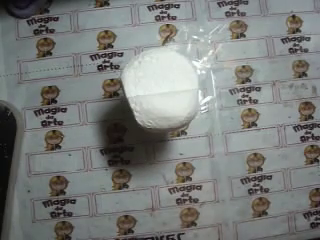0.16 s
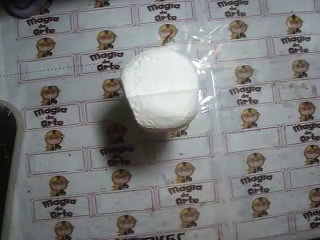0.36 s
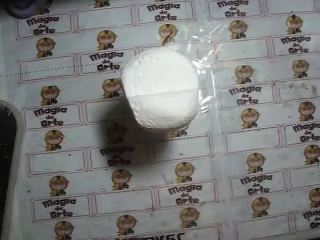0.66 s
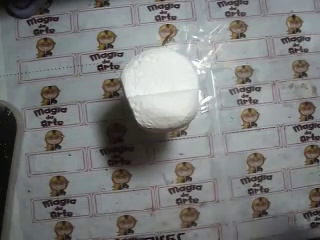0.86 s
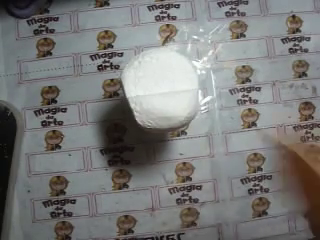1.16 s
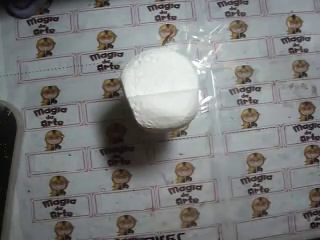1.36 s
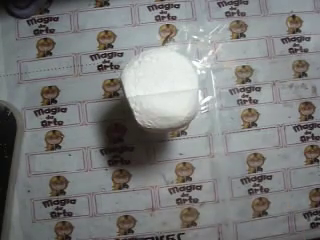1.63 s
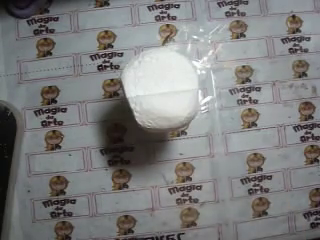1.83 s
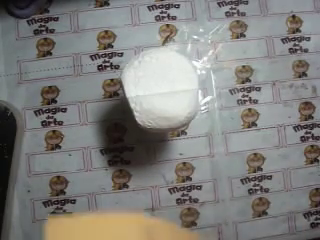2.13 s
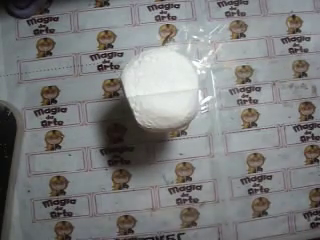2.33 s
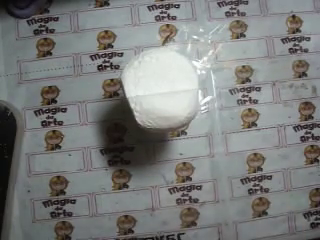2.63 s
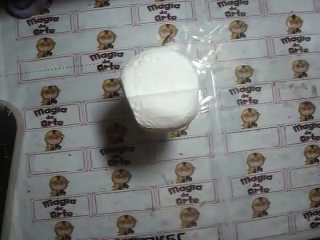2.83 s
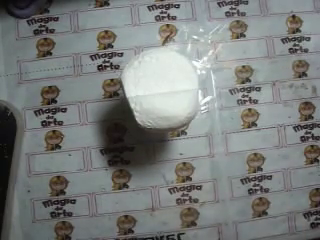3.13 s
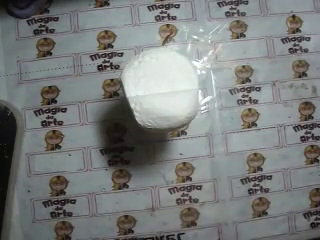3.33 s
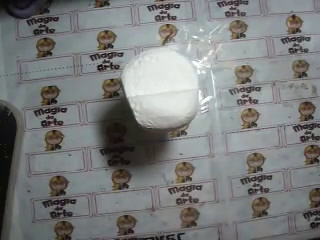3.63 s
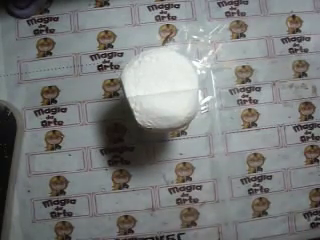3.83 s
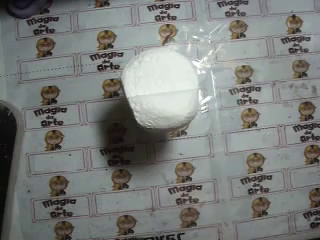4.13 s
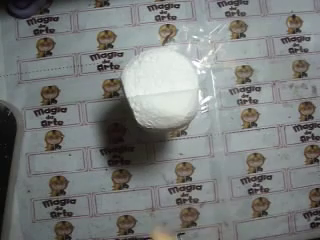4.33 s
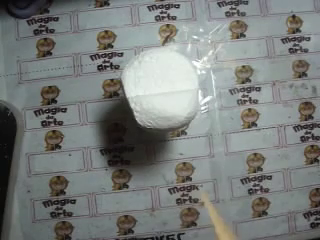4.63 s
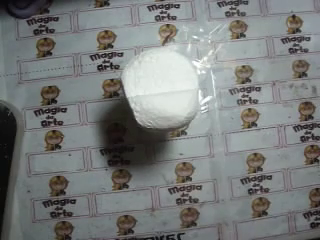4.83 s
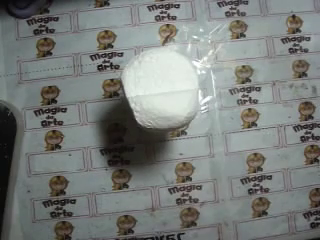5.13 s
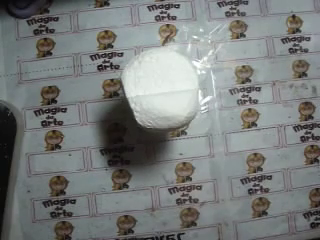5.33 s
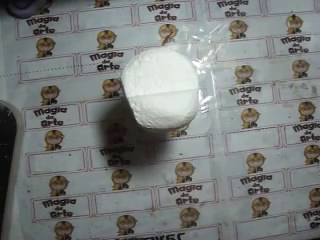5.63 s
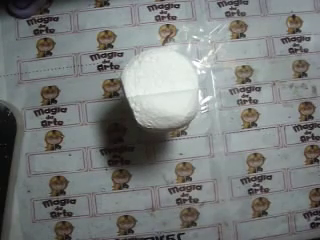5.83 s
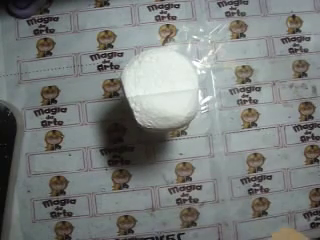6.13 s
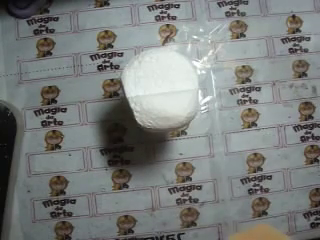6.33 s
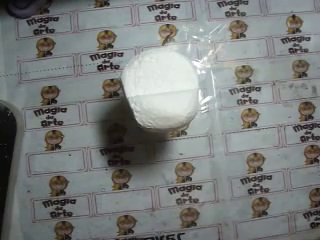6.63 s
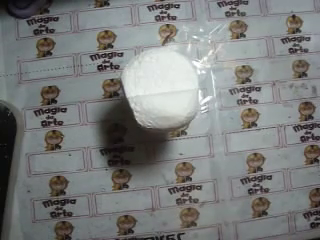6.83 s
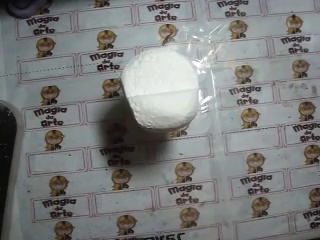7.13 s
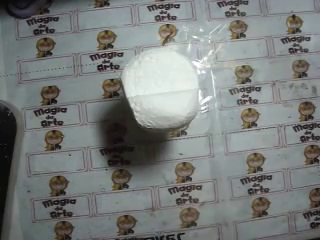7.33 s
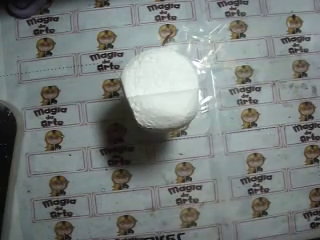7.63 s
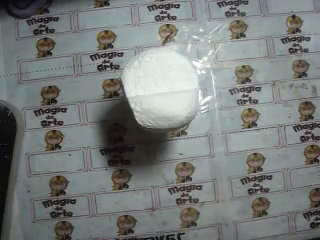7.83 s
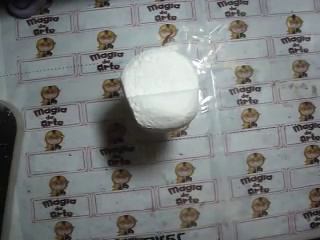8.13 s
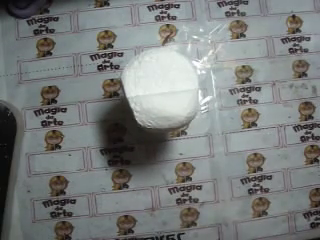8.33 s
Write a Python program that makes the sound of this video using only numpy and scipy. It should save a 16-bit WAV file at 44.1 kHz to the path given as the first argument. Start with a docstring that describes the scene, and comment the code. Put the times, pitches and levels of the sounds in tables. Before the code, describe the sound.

Steady buzzing fan and airy hiss in a small room, with scattered dry sheet clicks, soft table thuds and a faint engine outside.

```python
"""A heat gun runs steadily in a small room: its three-bladed fan hums as steady tones, its housing buzzes
as it rings from rotor knocks and draught, and shaped noise makes the air hiss out of the nozzle.
A craft sheet handled close to a dull little microphone ticks and crackles in short bursts of ringing noise.
Soft nudges thud through the table, and an engine drones faintly outside as three wavering tones.
The recorder limits the sharpest ticks and ducks after the loudest."""
import sys
import numpy as np
from scipy import signal
from scipy.fft import rfft, irfft, next_fast_len
from scipy.io import wavfile
from scipy.ndimage import uniform_filter1d, minimum_filter1d

SR = 44100
rng = np.random.default_rng(int(sys.argv[2]) if len(sys.argv) > 2 else 0)


def persist_wave(psi):
    """Save psi, clipped to +-1, as 16-bit WAV."""
    counts = np.round(np.clip(psi, -1, 1) * 32767).astype(np.int16)
    wavfile.write(sys.argv[1], SR, np.atleast_2d(counts).T)


N = 373086  # length of the scene in samples
TIME = np.arange(N) / SR  # seconds


def undb(db):
    """Turn decibels into a gain."""
    return 10 ** (np.asarray(db) / 20)


def level(x, db):
    """Scale a sound to a chosen average (rms) level."""
    return x * undb(db) / np.sqrt(np.mean(x ** 2))


def walk(rate):
    """Slow chance: about rate random steps a second, joined smoothly and scaled to rms 1."""
    steps = rng.standard_normal(4000)
    joined = np.interp(TIME * rate, np.arange(len(steps)), steps)
    return level(uniform_filter1d(joined, int(SR / rate / 2)), 0)


def coloured(points):
    """Noise whose spectrum follows (pitch_hz, level_db) points."""
    hz, db = np.transpose(points)
    size = next_fast_len(N)
    f = np.fft.rfftfreq(size, 1 / SR) + 1  # the 1 avoids log(0)
    gain = undb(np.interp(np.log(f), np.log(hz), db))
    return irfft(rfft(rng.standard_normal(size)) * gain, size)[:N]


def ring(x, modes):
    """Let a force set off resonances, each with a pitch, a width and a strength."""
    out = 0
    for hz, width, db in modes:
        out = out + undb(db) * signal.lfilter(*signal.iirpeak(hz, hz / width, fs=SR), x)
    return out


def lowpass(x, hz, order):
    """Smoothly remove the treble above hz."""
    return signal.sosfilt(signal.butter(order, hz, fs=SR, output="sos"), x)


def add(out, s, x):
    """Mix sound x into out, starting at s seconds."""
    i = max(int(s * SR), 0)
    out[i:i + len(x)] += x[:N - i]


# The engine outside: its pitch climbs slowly, then drops back as it fades.
# Columns: time_s [s], firing_rate_hz [Hz], level_db [dB, before engine_db]
ENGINE_PATH = [(0, 94.8, -52.5), (1.9, 96, -50.5), (2.3, 98, -40.5), (2.6, 99, -44), (2.95, 99.1, -36),
               (3.9, 102, -41.5), (4.5, 101, -52.5), (5.3, 100, -47), (5.68, 94.3, -31), (6.05, 90.6, -52),
               (8.4, 82, -61.5)]


def distant_engine(engine_db=-1, half_db=-13, upper_db=-16, waver=.006):
    """Only the drone of the firings gets indoors, with tones at half and one and a half times its rate."""
    s, hz, db = np.transpose(ENGINE_PATH)
    firing_hz = np.interp(TIME, s, hz) * (1 + waver * walk(rate=14))
    phase = 2 * np.pi * np.cumsum(firing_hz) / SR
    half = undb(half_db) * np.sin(phase / 2)
    upper = undb(upper_db) * np.sin(phase + phase / 2)
    return (np.sin(phase) + half + upper) * undb(np.interp(TIME, s, db) + engine_db)


# Soft nudges of the table. Columns: start_s [s], level_db [dB, before nudge_db]
TABLE_NUDGES = [(0.027, -38.5), (0.251, -39), (1.173, -37), (1.391, -38), (1.605, -40), (3.528, -42.5),
                (4.787, -41), (7.327, -41.5)]


def table(nudge_db=-7, swell_s=0.0047):
    """Soft pushes, made of briefly swelling noise, ring the table top at two low pitches: a thud."""
    out, t = np.zeros(N), TIME[:SR // 5]
    for s, db in TABLE_NUDGES:
        push = rng.standard_normal(len(t)) * t * np.exp(-t / swell_s)
        thud = ring(push, [(45, 21, 0.0065), (114, 23, 0.0051)])
        add(out, s, level(lowpass(thud, hz=220, order=2), db + nudge_db))
    return out


# What the sheet rings with: its bright crease, and its duller body.
# Columns of both: pitch_hz [Hz], width_hz [Hz], strength_db [dB, relative]
CREASE_RINGS = [(1490, 610, -2.5), (2096, 320, -3.5), (2620, 276, 2), (2934, 180, 0.5), (3185, 140, -7.5),
                (3500, 200, -8), (4670, 530, -6)]
BODY_RINGS = [(485, 220, -4.5), (770, 670, -8), (1013, 200, 7.5)]


def tick(db, body_db, t60, centre_hz, rise=0.095, hold=0.044, focus_hz=2000, tail_db=-20, tail_t60=0.095):
    """A crease gives way in a quick run of tiny slips, and the room answers faintly."""
    t = TIME[:SR // 10]
    slips, room = rng.standard_normal((2, len(t)))
    age = t / t60  # rise and hold are shares of t60, so a longer run also builds up more slowly
    run = (1 - np.exp(-age / rise)) * np.exp(-np.log(1000) * np.maximum(age - hold, 0))
    room_tail = room * undb(tail_db) * np.exp(-np.log(1000) * t / tail_t60)
    force = slips * run + room_tail
    # each crease favours the resonances near its own pitch
    pitched = ring(force, [(centre_hz, focus_hz, 0)])
    crease = lowpass(ring(pitched, CREASE_RINGS), 3700, order=5)
    body = lowpass(ring(force, BODY_RINGS), 1600, order=2)
    # a thin sheet radiates hardly any bass
    thin = signal.butter(4, 400, "high", fs=SR, output="sos")
    return signal.sosfilt(thin, level(crease, db) + level(body, db + body_db))


# a typical tick: level before tick_db, time to die away by 60 dB, and pitch
TYPICAL_DB, TICK_T60_S, TICK_HZ = -25, .028, 2470
# a harder tick snaps through sooner and sounds higher
SHORTER_OCT_PER_DB, HIGHER_OCT_PER_DB = 0.02, .008
HIGHER_OCT_PER_S = 0.033  # the ticks grow a little brighter as the work goes on


def creak(s, db, body_db):
    """The tick at time s; its length follows from its strength, its pitch from strength and time."""
    harder_db = db - TYPICAL_DB
    t60 = TICK_T60_S * 2 ** (-SHORTER_OCT_PER_DB * harder_db)
    centre_hz = TICK_HZ * 2 ** (HIGHER_OCT_PER_DB * harder_db + HIGHER_OCT_PER_S * s)
    return tick(db, body_db, t60, centre_hz)


# faint ticks: mean level (before tick_db), spread in level, spread in time around the clear ones
FAINT_DB, FAINT_SPREAD_DB, FAINT_SPREAD_S = -36.5, 1.5, .12
# Clear ticks of the sheet.
# Columns: start_s [s], level_db [dB, before tick_db], body_db [dB, dull body relative to the crease]
CLEAR_TICKS = [(0.032, -27, -8.5), (0.18, -31, -16), (0.254, -23, -6), (0.481, -17, -10.5),
               (0.661, -27, -7.5), (0.667, -21, -13), (0.682, -21, -12), (0.692, -24, -16),
               (0.956, -26, -6.5), (1.094, -28.5, -20), (1.176, -27, -5), (1.392, -26.5, -7),
               (1.54, -29, -25), (1.611, -28.5, -10.5), (2.369, -26, -25), (2.479, -17, -8.5),
               (2.633, -30.5, -15), (2.685, -25, -8.5), (2.852, -28.5, -9), (2.91, -26.5, -7.5),
               (3.065, -29, -14), (3.313, -14, -13.5), (3.542, -30.5, -6.5), (3.76, -32, -11.5),
               (4.001, -2.5, -13.5), (4.686, -28, -18), (4.695, -23.5, -8.5), (4.797, -23.5, -10.5),
               (5.0, -21, -8.5), (5.209, -24.5, -6), (5.375, -30.5, -20), (5.441, -21.5, -10.5),
               (6.003, -29.5, -7), (6.651, -21, -5.5), (6.817, -30, -10), (6.872, -25.5, -2.5),
               (7.252, -31.5, -13), (7.678, -24, -7.5), (8.363, -29.5, -2)]


def sheet(tick_db=-4.5, faint_body_db=-13, lead_s=0.00073):
    """The clear ticks, and faint ones scattered before and after them as the fingers shift."""
    out = np.zeros(N)
    for s, db, body_db in CLEAR_TICKS:
        add(out, s - lead_s, creak(s, db, body_db))  # starts a touch early, as a tick takes time to build
    chances = rng.standard_normal((len(CLEAR_TICKS), 2))
    for (s, _, _), (shift, strength) in zip(CLEAR_TICKS, chances):
        faint_s = (s + FAINT_SPREAD_S * shift) % TIME[-1]
        faint_db = FAINT_DB + FAINT_SPREAD_DB * strength
        # length follows the faint tick's own strength; pitch follows that and the clear tick's time
        add(out, faint_s, creak(s, faint_db, faint_body_db))
    return out * undb(tick_db)


SHAFT_HZ = 25.93  # turns per second of the fan


def shaft(wobble=.0007, flutter=.0012):
    """Count the turns made by the fan, whose speed wanders very slightly."""
    speed_hz = SHAFT_HZ * (1 + wobble * walk(rate=2.5) + flutter * walk(rate=30))
    return np.cumsum(speed_hz) / SR


# Colour of the air noise. Columns: pitch_hz [Hz], level_db [dB per Hz, relative]
AIR_COLOUR = [(20, -11.5), (50, -7), (90, -8), (130, -16.5), (270, -20), (450, -13.5), (700, -14.5),
              (1000, -16.5), (1450, -9.5), (2200, -12), (3050, -5.5), (3900, -22.5), (4900, -31),
              (6100, -37)]


def air(turns, throb=0.2, gust_db=1.5, air_db=-34.0):
    """Air rushes through the nozzle as noise, throbbing a little with the fan."""
    pulsing = 1 + throb * (np.sin(2 * np.pi * turns) + np.sin(4 * np.pi * turns))
    gusts = undb(gust_db * walk(rate=25))
    return level(coloured(AIR_COLOUR) * pulsing * gusts, air_db)


# Resonances of the gun's housing, rung by rotor and draught.
# Columns: pitch_hz [Hz], width_hz [Hz], strength_db [dB, relative]
HOUSING_RINGS = [(832, 24, -1), (906, 12, -3), (1118, 20, -1), (1245, 12, -1), (1300, 14, -1),
                 (1378, 16, 3), (1420, 28, 1), (1482, 28, 2), (1552, 18, 3), (1645, 20, 1), (1692, 28, 1),
                 (1860, 30, -1), (2160, 60, -2), (2640, 120, -2), (2970, 170, 3), (3220, 120, 0),
                 (4260, 160, -9)]


def rattle(turns, scatter_db=4, rattle_db=-39, draught_db=0):
    """The rotor brushes the same spots on every turn; these knocks and the draught ring the housing."""
    spots = rng.random(size=14)  # places around one turn
    laps = np.arange(int(turns[-1]) + 1)[:, None] + spots
    force = undb(scatter_db * rng.standard_normal(laps.shape))
    at = np.searchsorted(turns, laps.ravel())  # the sample at which each spot is reached
    knocks = level(np.bincount(at, force.ravel(), N + 1)[:N], 0)
    draught = undb(draught_db) * rng.standard_normal(N)
    housing = lowpass(ring(knocks + draught, HOUSING_RINGS), 3700, order=4)
    return level(housing, rattle_db)


# Fan tones; number three is the blade rate.
# Columns: multiple [times the shaft rate], level_db [dB, relative to base_db]
FAN_TONES = [(1, -8.5), (2, -13.5), (3, 1), (5, -22.5), (6, -17.5), (7, -18.5), (8, -21), (9, -17),
             (11, -17.5), (12, -21), (13, -26), (14, -13), (15, -14.5), (16, -17.5), (17, -15.5),
             (18, -17.5), (19, -14), (20, -27), (21, -14.5), (22, -19), (23, -19.5), (24, -17.5),
             (25, -24.5), (26, -31.5), (27, -22), (28, -17.5), (29, -17), (30, -29), (31, -14.5)]


def fan(turns, base_db=-40.0, shimmer_db=1.5):
    """Clean tones on multiples of the shaft rate, their levels ruffled by the air."""
    out = 0
    for k, db in FAN_TONES:
        tone = np.sin(2 * np.pi * (round(k) * turns + rng.random()))
        out = out + tone * undb(base_db + db + shimmer_db * walk(rate=6))
    return np.sqrt(2) * out  # makes the levels rms


def scene():
    """The engine outside, the sheet on the table and the gun, mixed to one channel."""
    turns = shaft()
    gun = air(turns) + rattle(turns) + fan(turns)
    return (distant_engine() + table() + sheet() + gun)[None]


def gain_control(x):
    """Loud peaks pull the gain down; it holds briefly, then comes back at a steady rate."""
    threshold_db, hold_s, release_db_per_s, deepest_db = -11, .06, 55, 7
    window = SR // 70
    power = signal.lfilter(np.ones(window) / window, 1, x[0] ** 2)
    over_db = 10 * np.log10(power + 1e-12) - threshold_db
    cut_db = np.clip(2 * over_db, 0, deepest_db)  # 2 dB of cut for each dB over
    hold = int(hold_s * SR) | 1
    cut_db = -minimum_filter1d(-cut_db, hold, origin=hold // 2)  # keep the deepest recent cut
    recovery = release_db_per_s * TIME
    return x * undb(recovery - np.maximum.accumulate(cut_db + recovery))


def limiter(x):
    """Squeeze the tallest swings within a millisecond and softly clip what is left."""
    knee, ceiling = .82, .72
    gain = knee / np.maximum(np.abs(x), knee)
    x = x * uniform_filter1d(minimum_filter1d(gain, SR // 2000), SR // 2000)
    return x / (1 + (x / ceiling) ** 20) ** (1 / 20)


TOP_HZ = 16000  # highest pitch kept after the limiter


def record(dry):
    """A narrow-band microphone, gain control and a peak limiter."""
    dull = lowpass(dry[0], 5200, order=10)[None]
    heard = signal.sosfilt(signal.ellip(8, .3, 80, 5900, fs=SR, output="sos"), dull)
    limited = limiter(gain_control(heard))
    return signal.sosfilt(signal.ellip(8, .2, 70, TOP_HZ, fs=SR, output="sos"), limited)


dry = scene()
out = record(dry)
persist_wave(out)
```